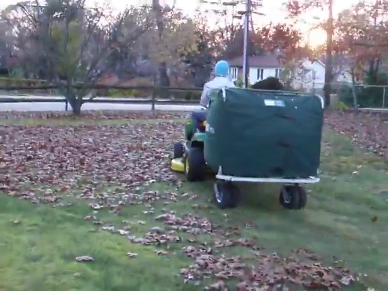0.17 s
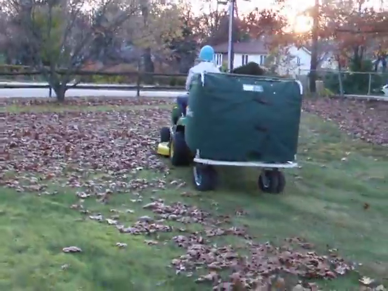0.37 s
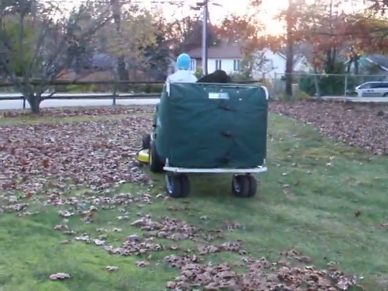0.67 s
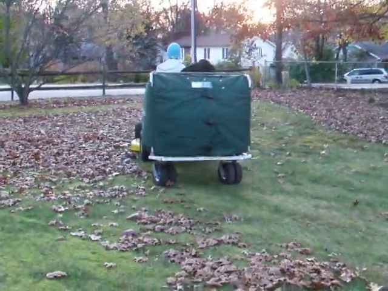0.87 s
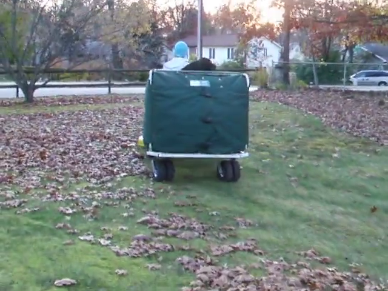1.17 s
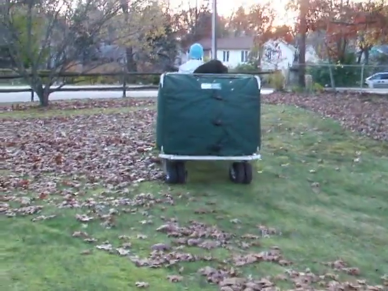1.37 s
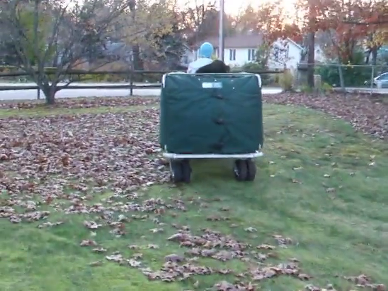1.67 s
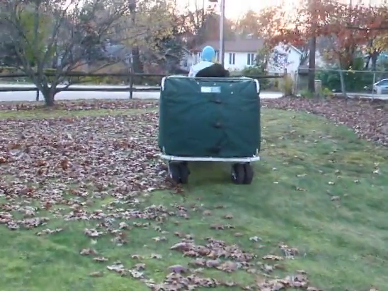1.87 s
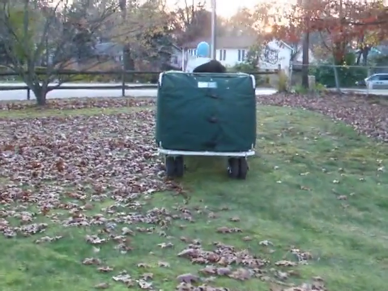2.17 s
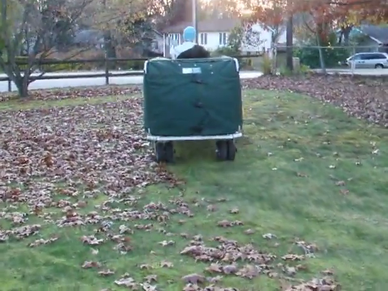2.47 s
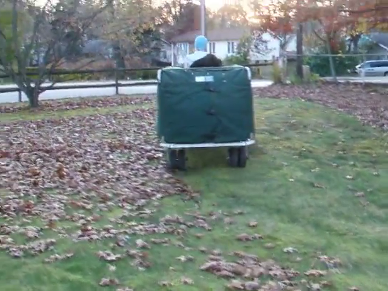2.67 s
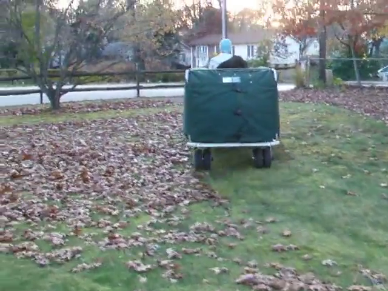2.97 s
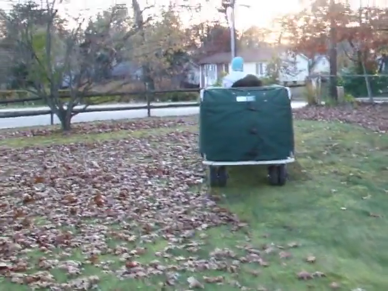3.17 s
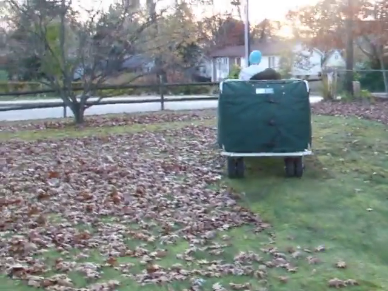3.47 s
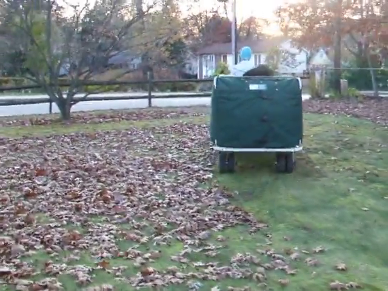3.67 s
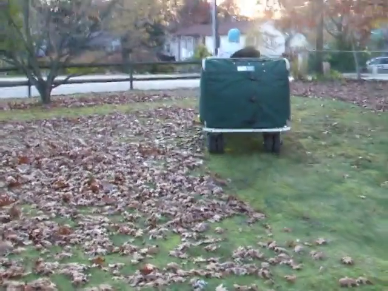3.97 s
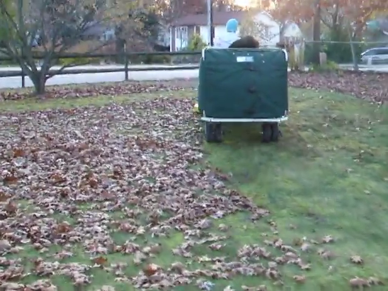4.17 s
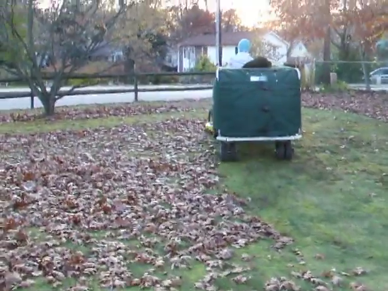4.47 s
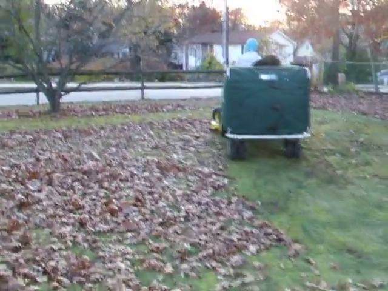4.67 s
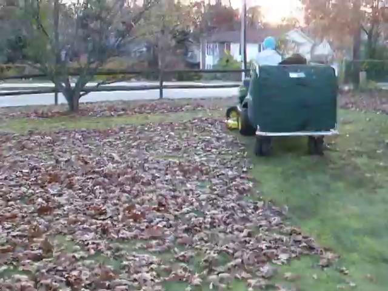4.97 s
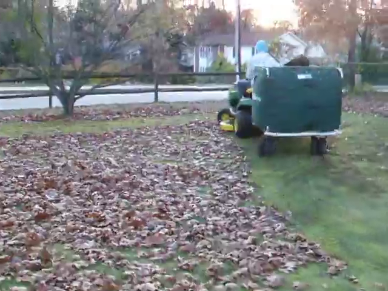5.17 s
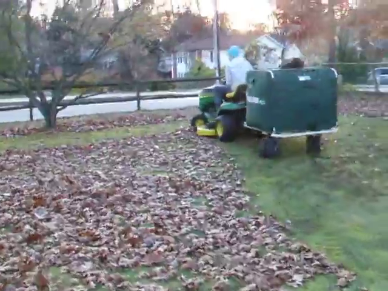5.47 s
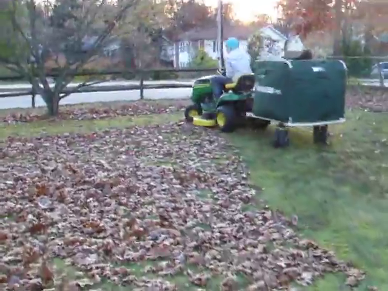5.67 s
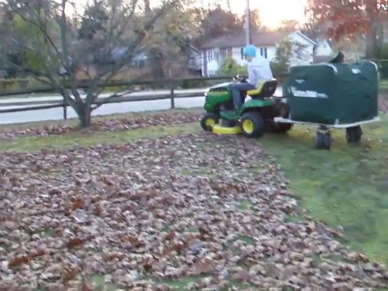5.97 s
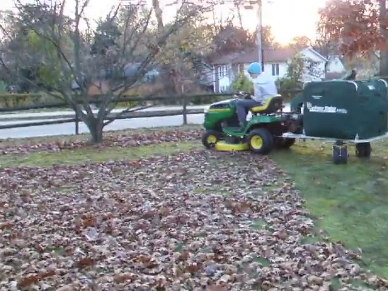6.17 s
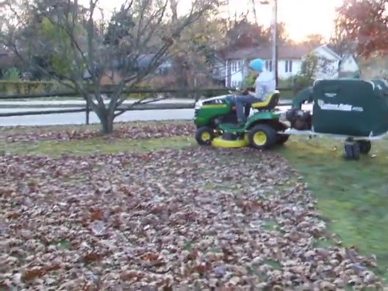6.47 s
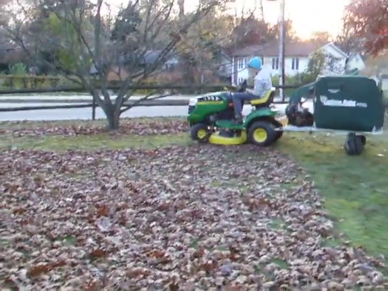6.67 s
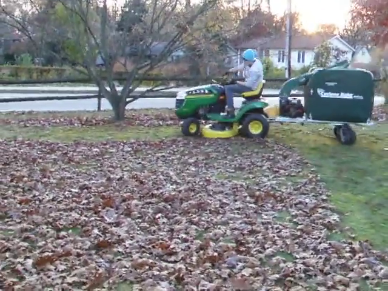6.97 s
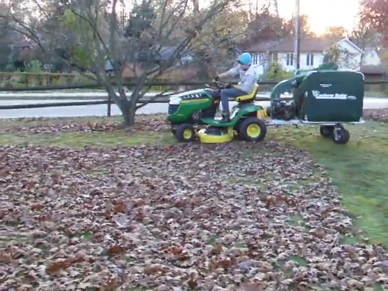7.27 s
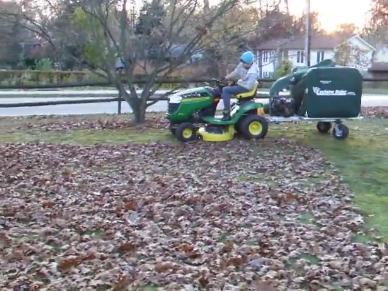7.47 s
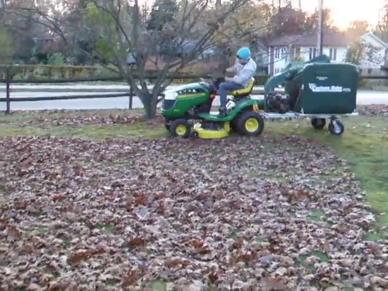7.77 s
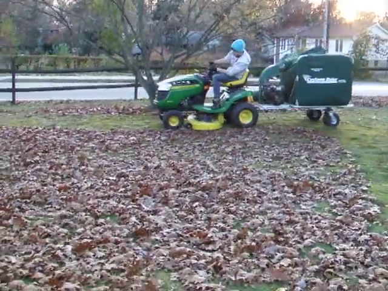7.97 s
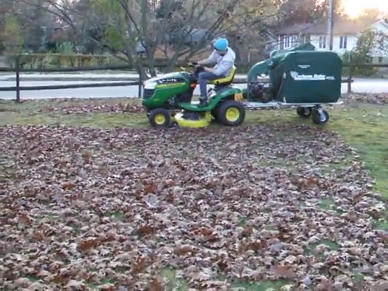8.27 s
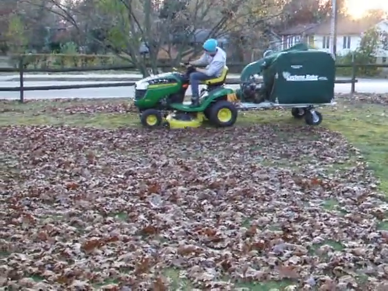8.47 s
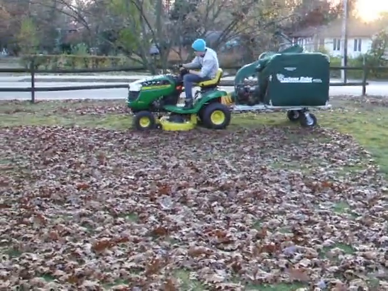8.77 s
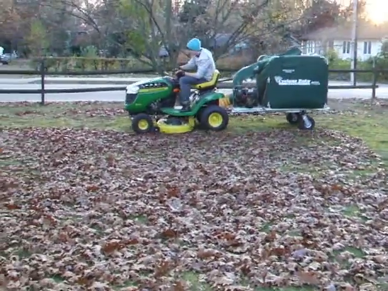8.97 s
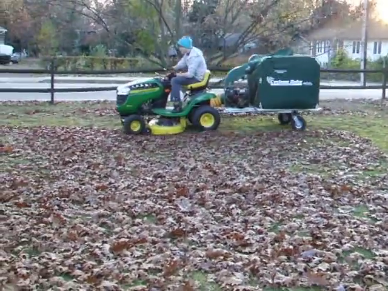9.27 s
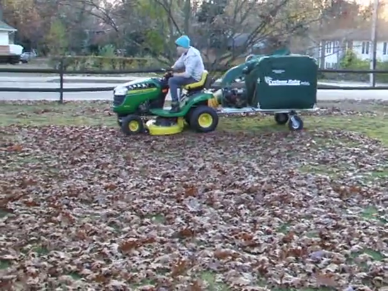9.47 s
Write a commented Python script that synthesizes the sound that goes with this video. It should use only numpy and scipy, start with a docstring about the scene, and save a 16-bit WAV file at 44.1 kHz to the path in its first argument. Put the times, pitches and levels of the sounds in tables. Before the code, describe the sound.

A lawn tractor towing a leaf vacuum runs throughout, several metres away outdoors. A strong, nearly pure fan hum holds its pitch over the drone of two engines and mower blades, a low rumble, rushing air and a soft crackling hiss of dry leaves in the hose. Small twigs click in the fan now and then during the first five seconds, and the drone eases slightly around 2 seconds as the machines move away. From about 5 to 6.5 seconds a hollow rush swells and slides down in pitch as they turn. From 6 seconds the hiss brightens and a rapid valve clatter comes forward. The hum weakens, dips near 7.7 seconds and returns by 8.4. Sharper twig cracks come at about 7.7, 8, 8.8 and 9.3 seconds, with the machines still running at the end.

```python
"""Lawn tractor towing a leaf vacuum

The pair drives away across a lawn, then turns side-on. The vacuum's fan hums over two engines
and the mower blades, while air and dry leaves rush through the hose. Once the collector bag no
longer hides the vacuum's engine, its valves clatter. Now and then a twig knocks in the fan."""
import sys
import numpy as np
from scipy import signal
from scipy.fft import rfft, irfft, next_fast_len
from scipy.io import wavfile
from scipy.ndimage import map_coordinates

SR = 44100
rng = np.random.default_rng(int(sys.argv[2]) if len(sys.argv) > 2 else 0)


def digitize_waveform(pressure):
    """Quantize a signal to 16-bit integers and store it at the path in sys.argv[1].

    Rows of a 2-D input are taken as channels; values are limited to [-1, 1].
    """
    field = np.atleast_2d(pressure).T
    bounded = np.clip(field, -1, 1)
    quanta = np.round(bounded * 32767).astype(np.int16)
    wavfile.write(sys.argv[1], SR, quanta)


N = 424241
TIME = np.arange(N) / SR

# Which way the machines face: t/s, heading (0 = seen from behind the bag, 1 = side-on)
HEADING = [(0, 0.38), (1.3, 0.48), (2.4, .02), (4.7, 0.16), (5.6, 0.67), (6.4, 0.72), (7.2, .91),
           (9.62, 0.97)]
# How far away they are: t/s, distance/m
PATH = [(0, 6.1), (1.4, 5.9), (2.6, 9.6), (5, 10.6), (9.62, 9.8)]
# Pitch of the fan's hum, sagging when it works hard: t/s, f/Hz
FAN_PITCH = [(0, 230.0), (0.55, 228.7), (1.15, 230.5), (1.9, 230.9), (2.3, 229.1), (3.4, 229.4),
             (4.6, 230.3), (5.7, 229.2), (6.0, 227.9), (6.7, 228.4), (7.1, 230.4), (8.5, 231.9),
             (9.2, 229.4), (9.62, 229.7)]
# Strength of that hum, fading and returning in the turn: t/s, level/dB
FAN_LEVEL = [(0, -17), (3.2, -16), (4.6, -15), (6.5, -20), (7.05, -17.5), (7.75, -26.1), (8.4, -18.5),
             (8.8, -20.7), (9.62, -20)]
# Tones of each engine and the mower: multiple of the cycle rate, level behind/dB, level side-on/dB
VACUUM_TONES = [(1, -58.5, -49.5), (2, -46.5, -38), (3, -62.5, -53.5), (4, -44.5, -39), (5, -43, -42.5),
                (6, -52.5, -47), (7, -38.5, -44), (9, -39, -39), (10, -44.5, -47), (11, -55.5, -56),
                (13, -53.5, -52.5), (15, -52, -53), (16, -40.5, -47), (17, -53.5, -53), (24, -54, -53),
                (34, -62.5, -53)]
TRACTOR_TONES = [(1, -55.5, -59), (2, -51.5, -51), (4, -53.5, -44), (5, -40.5, -43), (6, -44, -48.5),
                 (8, -42, -49), (12, -55.5, -52.5), (15, -60.5, -53), (19, -56.5, -51.5), (21, -48, -53),
                 (28, -56.5, -50)]
MOWER_TONES = [(1, -43, -35), (2, -36, -37.5), (3, -44.5, -51), (4, -58, -59.5), (7, -57.5, -50.5),
               (8, -60.5, -54)]
# Tone colour of the roar (behind, side-on) and of the hose's hiss: f/Hz, relative level/dB
ROAR_COLOUR_BEHIND = [(250, -21), (340, -5.5), (400, -6), (470, .5), (590, 2.5), (690, -3), (790, -4),
                      (870, -9.5), (1000, -5), (1160, -4), (1350, -13), (1550, -7.5), (2400, -19),
                      (5000, -47.5)]
ROAR_COLOUR_SIDE = [(250, -22), (340, -6), (410, -2), (490, -2), (640, 0), (700, -3), (780, 2.5), (900, -4),
                    (1130, 0.5), (1350, -6.5), (1700, -6.5), (2400, -19), (5000, -40)]
HISS_COLOUR = [(600, -29.5), (1400, -2), (2150, 0.5), (2900, -1.5), (3500, -1), (4000, -2.5), (4550, -1.5),
               (4900, 0.5), (5500, 2), (6000, 0), (6800, 1), (7500, 0), (8100, -7), (8700, -24.5)]
# How much hiss gets past the bag: t/s, relative level/dB
HISS_PAST_BAG = [(0, -34.5), (.5, -38), (1.85, -38.5), (2.05, -38), (3.3, -38.5), (4.65, -42.5), (5.3, -38),
                 (6.1, -33), (7.1, -34.5), (7.37, -31), (8.15, -29), (8.5, -31.5), (9.62, -30.5)]
# Wads of leaves going up the hose: t/s, half-length/s, extra level/dB
LEAF_WADS = [(1.49, 0.11, 2), (4.006, 0.036, 3), (7.66, 0.04, 2)]
# Ringing of the valve cover and cooling fins: f/Hz, width/Hz, relative level/dB
COVER_RINGS = [(1140, 71, -2.5), (2230, 400, 1.5), (3565, 230, 0.5), (3940, 210, 1), (4310, 150, 0),
               (4910, 200, 2.5), (5500, 400, 2.5), (6360, 780, 1), (7250, 770, 0)]
# Treble shaping of that ringing: f/Hz, relative level/dB
COVER_COLOUR = [(7500, -4.0), (8100, 0.5), (8700, -7.5)]
# Twigs hitting the fan: t/s, level/dB, time to fade by 60 dB/s
TWIG_HITS = [(.416, -29.5, 0.12), (.732, -28, .05), (1.402, -30, .12), (1.47, -29.5, 0.11),
             (1.559, -31, 0.12), (2.009, -30, .07), (2.16, -29, .08), (2.975, -26, 0.031),
             (3.985, -37, 0.16), (4.761, -33, .06), (7.655, -27, .08), (7.694, -18.5, 0.14),
             (8.04, -25, 0.13), (8.845, -22.5, 0.21), (9.283, -21.5, 0.069), (9.41, -23, 0.098),
             (9.569, -27, .06)]
# Tone colour of a twig's crack: f/Hz, relative level/dB
TWIG_COLOUR = [(300, -11.5), (700, 4), (1300, -8), (2300, -0.5), (4200, 4.5), (5400, 6.5), (7300, 2.5),
               (8100, -7.5), (8700, -19)]
# Upper band of the hollow rush as the cart swings round: t/s, f/Hz, level/dB
RUSH_GLIDE = [(4.7, 780, -63), (5.25, 750, -43.5), (5.6, 695, -36), (5.95, 626, -40), (6.3, 577, -48),
              (6.8, 558, -58)]
# Strength of the low rumble: t/s, relative level/dB
RUMBLE_SWELL = [(0, -34), (.8, -34.5), (1.2, -28.5), (2.1, -31.5), (3.4, -32.5), (4.6, -39.5), (6.3, -31),
                (7.8, -28), (9.62, -29.5)]
# Tone colour of the rumble (behind, side-on): f/Hz, relative level/dB
RUMBLE_COLOUR_BEHIND = [(15, -32.5), (35, -20), (60, -10), (90, -7), (130, -1.5), (175, -1), (250, 1.5),
                        (290, -3.5), (340, -10.5), (500, -38)]
RUMBLE_COLOUR_SIDE = [(15, -32.5), (35, -19), (60, -9), (90, -3), (130, -2), (175, -3.5), (250, -1.5),
                      (290, -7.5), (340, -16.5), (500, -36.5)]


def fan_hum(cycles, flutter_db):
    """Four blades on a shaft that turns twice per engine cycle give a nearly pure hum."""
    level_db = follow(FAN_LEVEL)[0] + flutter_db * wander(25)
    return np.sqrt(2) * gain_of(level_db) * np.sin(2 * np.pi * 8 * cycles)


def machine_drone(tones, cycles, side, roughness, flutter_db):
    """A repeating motion makes a stack of tones. Each flutters, and no two cycles are equally strong."""
    drone = np.zeros(N)
    for multiple, behind_db, side_db in tones:
        level_db = behind_db + side * (side_db - behind_db) + flutter_db * wander(7)
        drone += gain_of(level_db) * np.cos(2 * np.pi * (multiple * cycles + rng.random()))
    return np.sqrt(2) * drone * (1 + roughness * wander(30))


def air_roar(vacuum_cycles, tractor_cycles, side, rasp, throb):
    """Air swirls in the fan and mower housings and mixes with both exhausts."""
    air = rng.standard_normal((2, N)) * (1 + throb * puff(vacuum_cycles - 0.3, rise=0.061))
    behind = evened(air[0]) + rasp * exhaust_rasp(vacuum_cycles, rise=0.084)
    beside = evened(air[1]) + rasp * exhaust_rasp(tractor_cycles, rise=0.15)
    # the bag blocks the upper part of the roar, so from behind its low end stands out
    roar = np.sqrt(1 - side) * gain_of(3.5) * coloured(behind, ROAR_COLOUR_BEHIND)
    roar += np.sqrt(side) * coloured(beside, ROAR_COLOUR_SIDE)
    return roar * gain_of(0.5 * wander(18))


def exhaust_rasp(cycles, rise, points=1024):
    """The same ragged burst leaves the muffler at every firing, which makes a buzz."""
    place = np.arange(points) / points
    overtones = rfft(rng.standard_normal(points) * (0.6 + puff(place, rise)))
    burst = irfft(overtones / abs(overtones))  # all overtones equally strong
    return evened(np.interp(cycles % 1, place, burst, period=1))


def leaf_hiss(snaps_per_s, spread_db, crackle, gust_db):
    """Air rushes through the hose, crackling as leaves are shredded in uneven clumps."""
    sizes = gain_of(spread_db * np.minimum(rng.exponential(1, N), 4)) * rng.choice([-1, 1], N)
    snaps = sizes * (rng.random(N) < snaps_per_s / SR)
    energy = signal.lfilter([1], [1, -np.exp(-1 / (0.0015 * SR))], snaps ** 2)  # a short tail per snap
    rustle = evened(np.sqrt(energy) * rng.standard_normal(N))
    hiss = coloured(rng.standard_normal(N) + crackle * rustle, HISS_COLOUR)
    return hiss * gain_of(gust_db * wander(22))


def wad_swell_db():
    """Each wad of leaves makes the hiss swell smoothly for a moment."""
    return sum(db * np.exp(-((TIME - t) / half_length) ** 2) for t, half_length, db in LEAF_WADS)


def valve_clatter(cycles, rise, uneven_db, rattle_db, shift_db):
    """The valves snap shut once per engine cycle; each tap rings the cover a little differently."""
    since_tap = cycles - np.interp(7.899, TIME, cycles)  # one tap falls at 7.899 s
    taps = rng.standard_normal(N) * puff(since_tap, rise)
    taps *= gain_of(uneven_db * wander(40) + rattle_db * wander(900))
    cover = np.zeros(N)
    for k, (hz, width_hz, db) in enumerate(COVER_RINGS):
        ring = signal.lfilter(*signal.iirpeak(hz, hz / width_hz, fs=SR), taps)
        cover += (-1) ** k * gain_of(db + shift_db * wander(30)) * ring
    return coloured(cover, COVER_COLOUR)


def twig_knocks():
    """Each twig cracks against the fan blades and rattles briefly on up the chute."""
    strength = sum(strike(t, db, fade_s, rise_s=0.0018) for t, db, fade_s in TWIG_HITS)
    rattle = rng.standard_normal(N) * gain_of(1.4 * wander(350))
    return strength * coloured(rattle, TWIG_COLOUR)


def grit_ping(start_s, hz, level_db, fade_s):
    """A piece of grit makes the metal of the fan ring briefly."""
    return strike(start_s, level_db, fade_s, rise_s=0.004) * np.sin(2 * np.pi * hz * (TIME - start_s))


def hollow_rush(width_hz, lower_ratio, lower_db):
    """A hollow rush sounds in two narrow bands that slide down together as the cart swings round."""
    hz, db = follow(RUSH_GLIDE)
    lowpass = signal.butter(2, width_hz / 2, fs=SR, output="sos")
    slow_noise = signal.sosfilt(lowpass, rng.standard_normal((2, N)) + 1j * rng.standard_normal((2, N)))
    spin = 2j * np.pi * np.cumsum(hz) / SR  # lifts the slow noise up to the sliding pitch
    upper = evened((slow_noise[0] * np.exp(spin)).real)
    lower = evened((slow_noise[1] * np.exp(spin * lower_ratio)).real)
    return gain_of(db) * (upper + gain_of(lower_db) * lower)


def engine_rumble(side):
    """Uneven firing fills the gaps between the low tones with noise, which sounds deeper side-on."""
    behind, beside = rng.standard_normal((2, N))
    rumble = np.sqrt(1 - side) * gain_of(1.4) * coloured(behind, RUMBLE_COLOUR_BEHIND)
    rumble += np.sqrt(side) * gain_of(-3) * coloured(beside, RUMBLE_COLOUR_SIDE)
    return gain_of(follow(RUMBLE_SWELL)[0]) * rumble


def reach(side, base_db, hiss_share, side_db, falloff):
    """How much of a sound reaches us: it swells with the hiss, shifts side-on and fades with distance."""
    hiss_db, metres = follow(HISS_PAST_BAG)[0], follow(PATH)[0]
    level_db = base_db + hiss_share * (hiss_db - hiss_db.mean()) + side_db * side
    return gain_of(level_db) * (metres.mean() / metres) ** falloff


def strike(start_s, level_db, fade_s, rise_s):
    """Strength of one hit: it rises fast and dies away by 60 dB every fade_s."""
    age = np.clip(TIME - start_s, 0, 1)
    return gain_of(level_db - 60 * age / fade_s) * (1 - np.exp(-age / rise_s))


def puff(cycles, rise):
    """One quick swell and fade per cycle; rise is the share of the cycle it takes to peak."""
    age = cycles % 1 / rise
    return age * np.exp(1 - age)


def wander(per_s):
    """A smooth random wobble of average size 1 that changes about per_s times a second."""
    points = rng.standard_normal(8192)
    coarse = map_coordinates(points, [TIME[::32] * per_s], order=3, mode="wrap")
    return evened(np.interp(TIME, TIME[::32], coarse))


def coloured(sound, colour):
    """Turns each frequency up or down as a colour table says, then scales to average size 1."""
    hz, db = np.transpose(colour)
    size = next_fast_len(N)
    all_hz = np.fft.rfftfreq(size, 1 / SR)
    gains = gain_of(np.interp(np.log(all_hz + 1), np.log(hz), db))
    return evened(irfft(rfft(sound, size) * gains, size)[:N])


def follow(table):
    """Joins a table's points in time with straight lines, giving one curve per value column."""
    times, *columns = np.transpose(table)
    return [np.interp(TIME, times, column) for column in columns]


def evened(x):
    """Scales a signal so that its average size (root mean square) is 1."""
    return x / np.sqrt(np.mean(x ** 2) + 1e-20)


def gain_of(db):
    """Turns decibels into a number to multiply by."""
    return 10 ** (np.asarray(db) / 20)


def scene():
    """Both engines run at nearly steady speeds; the heading decides what the bag hides."""
    side = np.clip(follow(HEADING)[0], 0, 1)
    shaft_hz = follow(FAN_PITCH)[0] / 4  # four blades
    # running counts of cycles; an engine cycle takes two turns of the shaft
    vacuum = np.cumsum(shaft_hz / 2 * (1 + 0.002 * wander(20))) / SR
    mower = np.cumsum(93.32 * (1 + 0.003495 * wander(3))) / SR  # about 93 blade passes a second
    tractor = mower / 3.469  # a belt ties the mower to the tractor's engine
    drone = machine_drone(VACUUM_TONES, vacuum, side, roughness=0.25, flutter_db=1.7)
    drone += machine_drone(TRACTOR_TONES, tractor, side, roughness=0.23, flutter_db=1.9)
    drone += machine_drone(MOWER_TONES, mower, side, roughness=0.27, flutter_db=0.55)
    roar = air_roar(vacuum, tractor, side, rasp=0.35, throb=0.45)
    mix = fan_hum(vacuum, flutter_db=0.34) + engine_rumble(side)
    mix += drone * reach(side, base_db=0.5, hiss_share=0.3, side_db=-1, falloff=0.51)
    mix += roar * reach(side, base_db=-38, hiss_share=0.42, side_db=2.5, falloff=0.6)
    hiss_db = follow(HISS_PAST_BAG)[0] + wad_swell_db() + 2 - 1.7 * side
    mix += gain_of(hiss_db) * leaf_hiss(snaps_per_s=800, spread_db=3.5, crackle=0.63, gust_db=0.5)
    clatter = valve_clatter(vacuum, rise=0.099, uneven_db=0.6, rattle_db=0.3, shift_db=1.8)
    mix += clatter * reach(side, base_db=-45, hiss_share=0.81, side_db=6.5, falloff=0.089)
    mix += twig_knocks() + grit_ping(start_s=3.985, hz=5300, level_db=-38, fade_s=0.22)
    mix += hollow_rush(width_hz=85, lower_ratio=0.8, lower_db=-5.5)
    return mix[None]


def record(dry):
    """The microphone steeply cuts off the treble above 8750 Hz."""
    lowpass = signal.firwin(301, 8750, window=("kaiser", 9), fs=SR)
    return signal.oaconvolve(dry, lowpass[None], "same")


dry = scene()
out = record(dry)
digitize_waveform(out)
```